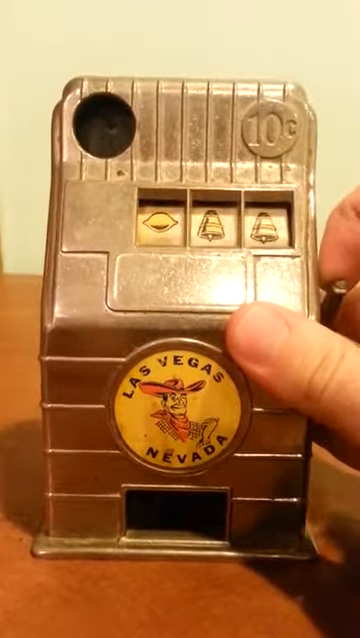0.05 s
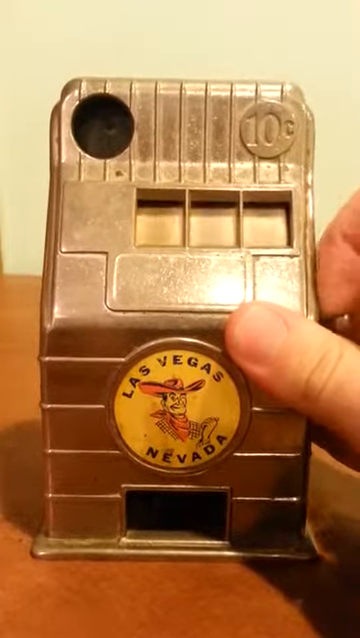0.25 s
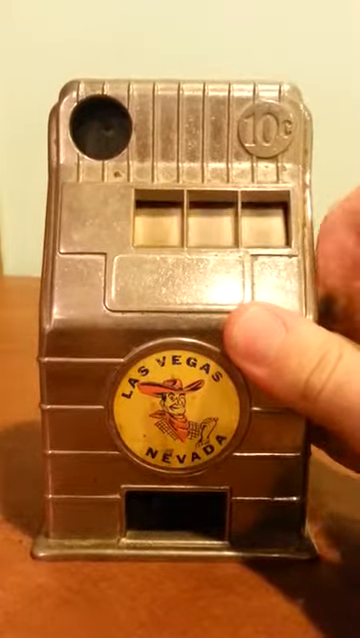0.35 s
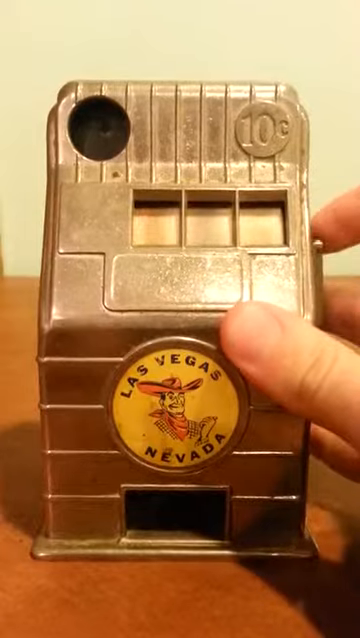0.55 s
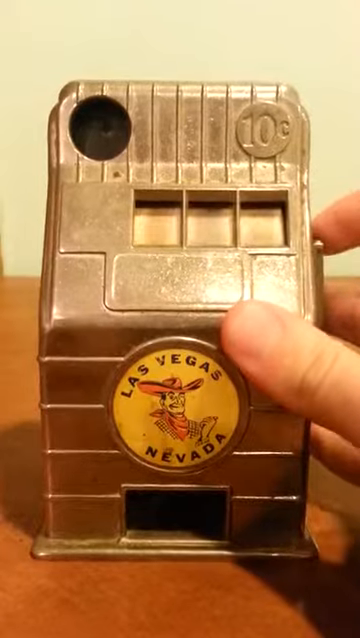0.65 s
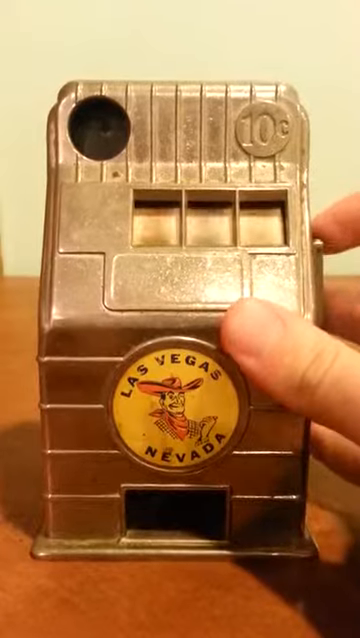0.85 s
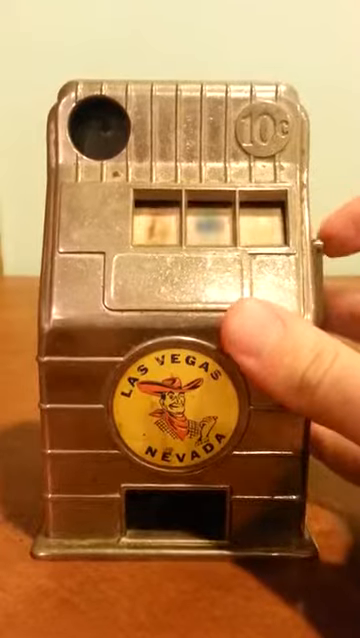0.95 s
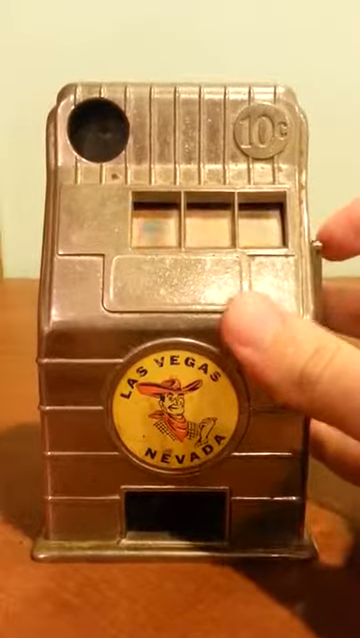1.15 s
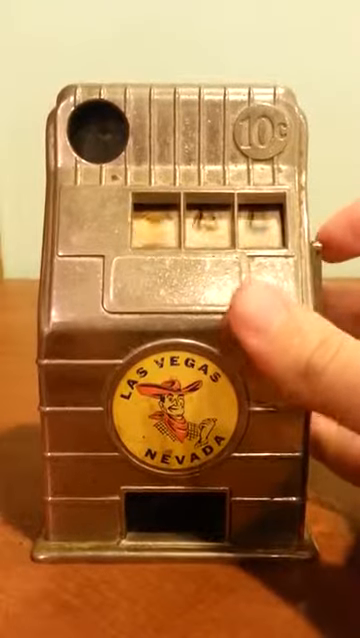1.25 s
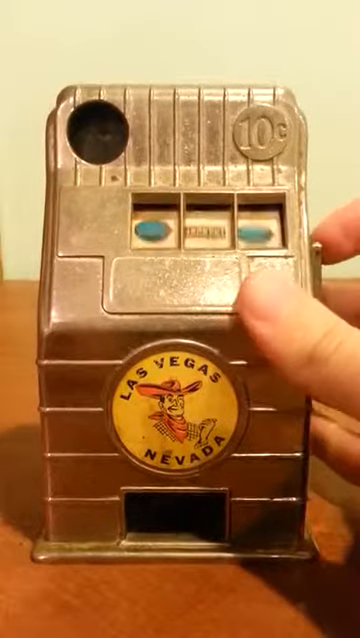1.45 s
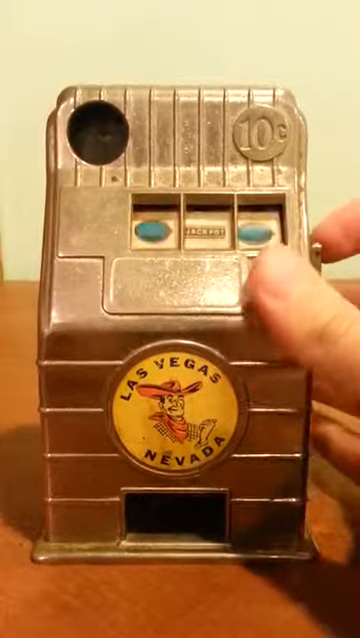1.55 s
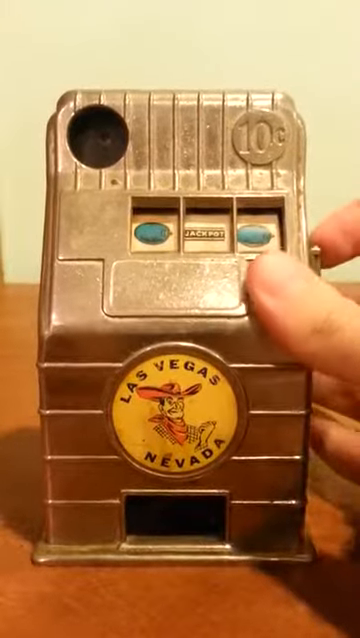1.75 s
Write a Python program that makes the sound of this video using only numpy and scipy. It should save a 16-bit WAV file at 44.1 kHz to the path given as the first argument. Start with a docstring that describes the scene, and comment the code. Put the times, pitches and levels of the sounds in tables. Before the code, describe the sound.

A toy metal slot machine, close and dry in a small room with faint low room tone. A bright lever click at 0.24 s, then a very loud clack at 0.3 s with bouncing knocks until 0.57 s. Tin reels rattle and whir, thinning by 1 s; light ticks and dull catches follow until 1.47 s. Tiny falling squeaks at 1.57 and 1.65 s each meet a soft bump.

```python
"""Toy slot machine on a table

A small die-cast toy slot machine on a wooden table, heard from close by in a small room.
The lever clicks, then trips the spring with a loud clack; three tin reels whir and rattle as it knocks back.
The reels slow, tick and are caught one after another; two tiny squeaks, each ending in a soft bump, close the run.
Contacts are short-lived noise bands and decaying modes; the spin is a dense spray of them; squeaks are gliding tones."""
import sys
import numpy as np
from scipy import signal
from scipy.io import wavfile
from scipy.ndimage import uniform_filter1d

SR = 44100
rng = np.random.default_rng(int(sys.argv[2]) if len(sys.argv) > 2 else 0)


def unload_audio(sound):
    """Save the sound as a 16-bit wav file, at the path given as the first command line argument."""
    columns = np.transpose(np.atleast_2d(sound))
    # keep every value between -1 and 1, then stretch to whole-number steps
    steps = np.round(np.clip(columns, -1, 1) * 32767)
    wavfile.write(sys.argv[1], SR, steps.astype(np.int16))


N = 79380
T = np.arange(N) / SR

# metal contacts of lever, pawls and reels: (time [s], crack level [dB], case ring level [dB], reel ring level [dB])
CONTACTS = [(0.2356, -12, -35.5, -32), (0.3006, -4, -7, -20), (0.305, -7, -17.5, -36),
            (0.32, -3.5, -33, -8), (.382, -11, -17.5, -19), (0.398, -14, -42, -9.5),
            (0.41, -33, -56, -17.5), (.4737, -23, -19.5, -27), (.4932, -15, -26.5, -24),
            (0.5217, -14, -54, -15.5), (.56, -6.5, -21, -20.5), (.5685, -11, -22.5, -8),
            (.6645, -51, -34.5, -35), (.7192, -22.5, -27, -25.5), (.7561, -26, -31.5, -29),
            (0.8135, -38.5, -53, -26.5), (.8868, -21.5, -28, -57), (.9092, -23.5, -35.5, -22.5),
            (.937, -27.5, -35.5, -48), (.9701, -28, -43, -70), (1.0245, -28, -49, -62),
            (1.097, -33.5, -47.5, -37), (1.219, -33, -54, -40.5), (1.2285, -49, -32.5, -33),
            (1.2546, -23, -42, -50), (1.297, -33, -43, -39), (1.3333, -49, -47.5, -55),
            (1.3846, -32.5, -42.5, -36), (1.398, -34, -34, -28.5), (1.4538, -26.5, -33, -26.5),
            (1.465, -30, -31, -42)]
# heavy blows that shake the table; the first releases the spring: (time [s], level [dB])
HEAVY_BLOWS = [(0.304, -37), (.352, -33.5), (0.56, -43.5)]
# modes of the cast case: (frequency [Hz], relative level [dB], T60 [s])
CASE_MODES = [(528.8, -9, 0.07), (593, -7.5, 0.042), (704, -11.5, 0.08), (812.6, -4, 0.05), (880, -6, 0.1),
              (1268, 0, 0.037), (1370, -4, 0.073), (1438, -4.5, 0.026)]
# modes of the tin reels: (frequency [Hz], relative level [dB], T60 [s])
REEL_MODES = [(2484, -34.5, 0.033), (2885, -24.5, 0.18), (3140, -7.5, 0.067), (3850, -17, 0.036),
              (4270, 2, 0.022), (4368, -4, 0.018), (5296, -9.5, 0.04), (6040, -16, 0.069)]
# stereo balance: (frequency [Hz], left minus right level [dB])
STEREO_BALANCE = [(350, 2), (550, 4.5), (850, 3.5), (5000, -2.5)]

REEL_WAVER, CASE_WAVER = .016, .01  # rms share by which pitches wander
RISE_S = 0.0019  # time constant with which a contact spreads through the metal
LEFT_LAG_S, LAG_ABOVE_HZ = 0.000435, 1100  # the treble reaches the left channel later


def from_db(db):
    """Decibels are twenty times the decimal logarithm of amplitude: convert to gain."""
    return 10 ** (np.asarray(db) / 20)


def rms_one(x):
    """Root-mean-square normalisation: scale to unit rms."""
    return x / np.sqrt(np.mean(x ** 2) + 1e-20)


def at_hz(points, hz):
    """Interpolate a table along a logarithmic frequency axis."""
    f, v = np.transpose(points)
    return np.interp(np.log(hz), np.log(f), v)


def level(curve, s):
    """Gain of an envelope drawn in decibels, silent outside its ends."""
    return from_db(np.interp(s, *np.transpose(curve), left=-200, right=-200))


def pan(db):
    """Intensity stereo: split a left-minus-right level difference between two gains."""
    return from_db(np.array([[db], [-db]]) / 2)


def decay_per_sample(t60):
    """Exponential decay: the amplitude factor per sample that gives 60 dB in t60 seconds."""
    return np.exp(-np.log(1000) / (t60 * SR))


def soften(x, seconds):
    """First-order relaxation: spread an onset over a short rise time."""
    r = np.exp(-1 / (seconds * SR))
    return signal.lfilter([1 - r], [1, -r], x)


def clicks(s, sizes):
    """Impulsive excitation: a train of single-sample blows."""
    out = np.zeros(N, np.asarray(sizes).dtype)
    np.add.at(out, np.clip((s * SR).astype(int), 0, N - 1), sizes)
    return out + 1e-18  # keeps the filters off exact zero


def noise_bands(spectrum):
    """Third-octave analysis: yield (Hz, stereo noise band); the bands share unit power before balance."""
    # interchannel coherence: (frequency [Hz], left-right correlation [1])
    coherence = [(600, 0.36), (14000, 0.1)]
    edges = 28 * 2 ** (np.arange(29) / 3)
    centres = np.sqrt(edges[1:] * edges[:-1])
    gains = from_db(at_hz(spectrum, centres)) * np.sqrt(np.diff(edges))
    gains = gains / np.linalg.norm(gains)
    white = rng.standard_normal((2, 2, N))
    for k, hz in enumerate(centres):
        band_pass = signal.butter(2, edges[k:k + 2], "band", fs=SR, output="sos")
        mid, side = signal.sosfilt(band_pass, white[k % 2])
        alike = np.clip(at_hz(coherence, hz), -1, 1)
        band = rms_one(np.sqrt(1 + alike) * mid + np.sqrt(1 - alike) * side * [[1], [-1]])
        if hz > LAG_ABOVE_HZ:
            band[0] = np.roll(band[0], int(LEFT_LAG_S * SR))
        yield hz, band * pan(at_hz(STEREO_BALANCE, hz)) * gains[k]


def crack(s, db, tilt_db):
    """High modal density: each contact wakes a crowd of brief modes, heard as noise; the high ones die first."""
    # spectrum of a contact: (frequency [Hz], relative density [dB per Hz])
    spectrum = [(40, -21.5), (280, -7), (560, -7.5), (820, -1), (1080, -1.5), (2200, 0.5), (3600, 8),
                (6200, -2), (10000, -3.5), (14000, -14.5)]
    t60_at_3khz, damping_power = 0.043, 0.36  # seconds; power of frequency by which it shortens
    colour_spread_db = 5.5  # of each band from contact to contact
    out = np.zeros((2, N))
    for hz, band in noise_bands(spectrum):
        ratio = hz / 3000
        power_decay = decay_per_sample(t60_at_3khz / ratio ** damping_power) ** 2
        colour_db = colour_spread_db * (np.clip(rng.standard_normal(len(s)), -2, 2) - .5)
        band_db = db + colour_db + tilt_db * np.log2(max(ratio, .5))  # tilt in dB per octave
        power = clicks(s, from_db(band_db) ** 2)
        out += band * np.sqrt(signal.lfilter([1], [1, -power_decay], soften(power, RISE_S)))
    return out


def ring(modes, s, db, waver=0):
    """Modal synthesis: blows excite damped resonances unevenly; pitches wander by the rms share `waver`."""
    strike_spread_db = 3.5
    out = np.zeros((2, N))
    for hz, mode_db, t60 in modes:
        size, turn = rng.standard_normal((len(s), 2)).T
        wander = rms_one(uniform_filter1d(rng.standard_normal(N), size=450))
        spin = np.exp(2j * np.pi * np.cumsum(hz * (1 + waver * wander)) / SR)
        blows = clicks(s, from_db(db + mode_db + strike_spread_db * size) * np.sign(turn))
        # dividing by the carrier starts every blow at the same phase
        envelope = signal.lfilter([1], [1, -decay_per_sample(t60)], blows / spin)
        z = spin * soften(envelope, RISE_S)
        left_phase = 2 * np.pi * hz * LEFT_LAG_S * (hz > LAG_ABOVE_HZ) + .5 * rng.standard_normal()
        stereo = np.imag([z * np.exp(-1j * left_phase), z])
        out += np.sqrt(2) * pan(at_hz(STEREO_BALANCE, hz)) * stereo
    return out


def bounces(s, db, count):
    """Inelastic rebound: each contact lands again in an uneven, dying run; harder ones lose more each time."""
    mean_gap_s = .006
    loss_slope, lossless_db = 0.51, -52  # dB lost per bounce for each dB above this level
    gaps = mean_gap_s * (.5 + rng.random((len(s), count)))
    loss_db = loss_slope * np.maximum(db - lossless_db, 10)
    losses = np.outer(loss_db, 1 + np.arange(count))
    again_s = s[:, None] + np.cumsum(gaps, axis=1)
    return np.append(s, again_s), np.append(db, db[:, None] - losses)


def clacks():
    """Impact excitation: hard contacts crack, bounce and ring case and reels; heavy blows shake the table."""
    # modes of the wooden table: (frequency [Hz], relative level [dB], T60 [s])
    table_modes = [(99.5, -4.5, 0.45), (121.2, 2.5, 0.28), (251, -1, 0.24)]
    bright_above_db, tilt_per_db = -20, 0.2425  # harder is brighter: dB per octave for each dB
    s, db, case_db, reel_db = np.transpose(CONTACTS)
    crack_s, crack_db = bounces(s, db, count=3)
    out = crack(crack_s, crack_db, tilt_per_db * (crack_db - bright_above_db))
    out += ring(CASE_MODES, s, case_db, CASE_WAVER)
    out += ring(REEL_MODES, s, reel_db, REEL_WAVER)
    return out + ring(table_modes, *np.transpose(HEAVY_BLOWS))


def spinning_reels():
    """Dense random impacts: loose reels chatter brightly on the axle and whir through the case."""
    # chatter on the axle: (time [s], level [dB])
    rattle = [(.3, 8), (.315, -17), (.4, -23), (.435, -36.5), (.485, -21), (.545, -30), (.73, -33.5),
              (.85, -47.5), (.925, -31), (1.0, -75), (1.2, -57), (1.27, -47), (1.36, -64.5), (1.41, -38.5),
              (1.48, -98)]
    # rumble of the turning reels through the case: (time [s], level [dB])
    whir = [(0.298, -25.5), (.39, -36.5), (.72, -39), (.85, -50), (0.929, -41.5), (0.998, -67.5),
            (1.25, -55), (1.35, -62), (1.43, -49), (1.519, -91)]
    count, contacts_per_s, spread_db = 700, 400, 3
    slip, size = rng.standard_normal((count, 2)).T
    s = rattle[0][0] + (np.arange(count) + 2 * slip) / contacts_per_s
    uneven_db = spread_db * np.clip(size, -2, 2)
    rattle_db = 20 * np.log10(level(rattle, s)) + uneven_db
    whir_db = 20 * np.log10(level(whir, s)) + uneven_db
    out = crack(s, rattle_db, tilt_db=-0.14)
    out += ring(REEL_MODES, s, rattle_db - 7.5, REEL_WAVER)
    return out + ring(CASE_MODES, s, whir_db, CASE_WAVER)


def lever_catch():
    """Free vibration: the catch pings as the lever slides past it; the spring then lets go and hums."""
    # modes of the lever's catch: (frequency [Hz], level [dB], T60 [s])
    catch_modes = [(291, -36.5, 0.29), (590, -31.5, 0.16), (3050, -25.5, .03), (6220, -10, 0.016),
                   (9940, -11, 0.021)]
    # hum of the released spring: (frequency [Hz], level [dB], T60 [s])
    spring_modes = [(391.7, -50.5, 4.5)]
    catch_s, release_s = CONTACTS[0][0], HEAVY_BLOWS[0][0]
    ping = ring(catch_modes, np.array([catch_s]), 0, REEL_WAVER)
    return ping + ring(spring_modes, np.array([release_s]), 0)


def pawl():
    """Modal ringing: the dropping pawl sounds clearly between the last turns."""
    # drops of the pawl: (time [s])
    drop_s = [.972, 1.0245]
    # modes of the pawl: (frequency [Hz], level [dB], T60 [s])
    pawl_modes = [(903, -38.5, 0.078), (1388, -26.5, 0.069)]
    return ring(pawl_modes, np.array(drop_s), 0, CASE_WAVER)


def squeaks():
    """Frictional oscillation: metal rubs on metal in short, nearly pure chirps that sag in pitch."""
    # squeaks of the mechanism: (time of peak [s], length [s], frequency at peak [Hz], level [dB])
    chirps = [(1.571, 0.015, 3330, -35.5), (1.654, 0.013, 3455, -39)]
    octave_db, waver_share, sag_hz_per_s = -21, 0.0111, 3000
    out = np.zeros(N)
    for s, length, hz, db in chirps:
        waver = rms_one(uniform_filter1d(rng.standard_normal(N), size=150))
        pitch = hz * (1 + waver_share * waver) - sag_hz_per_s * (T - s)
        phase = 2 * np.pi * np.cumsum(pitch) / SR
        swell = np.exp(-(2 * (T - s) / length) ** 2)
        tone = np.sin(phase) + from_db(octave_db) * np.sin(2 * phase)
        out += np.sqrt(2) * from_db(db) * swell * tone
    return out * pan(-6.5)


def bumps():
    """Soft impact: settling parts ring only low modes of the case, with a dull scuff."""
    # settling of the parts: (time [s], level [dB])
    settling = [(1.186, -37.5), (1.29, -35), (1.443, -29), (1.579, -30.5), (1.658, -36.5)]
    # low modes of the case: (frequency [Hz], relative level [dB], T60 [s])
    low_modes = [(576, -2.5, 0.045), (890, -15, 0.055)]
    s, db = np.transpose(settling)
    return ring(low_modes, s, db, CASE_WAVER) + crack(s, db - 7, tilt_db=-7)


def room(x):
    """Diffuse reverberation: the short, slightly dull, exponentially decaying tail of a small room."""
    t60, tail_db, dull_above_hz, build_up_s = 0.17, -13, 7100, 0.0067
    t = T[:SR // 2]
    envelope = np.exp(-np.log(1000) * t / t60) * (1 - np.exp(-t / build_up_s))
    tail = rng.standard_normal((2, len(t))) * envelope
    tail = signal.sosfilt(signal.butter(1, dull_above_hz, fs=SR, output="sos"), tail)
    tail = tail / np.linalg.norm(tail, axis=1, keepdims=True)
    return from_db(tail_db) * signal.fftconvolve(x, tail, axes=1)[:, :N]


def room_tone():
    """Stationary noise: a quiet, steady background shaped in third octaves."""
    # spectrum of the background: (frequency [Hz], relative density [dB per Hz])
    spectrum = [(30, -28.5), (115, 2.5), (230, 2.5), (800, -11.5), (14000, -23)]
    return from_db(-53.5) * sum(band for hz, band in noise_bands(spectrum))


def scene():
    """Superposition: the toy, its reverberation and the room tone add linearly."""
    toy = clacks() + spinning_reels() + lever_catch() + pawl() + squeaks() + bumps()
    return toy + room(toy) + room_tone()


def record(dry):
    """Saturation and band-limiting: the loudest peaks round off below full scale; the top is cut."""
    clip_level, cutoff_hz = 1, 14800
    clipped = dry / (1 + (dry / clip_level) ** 4) ** .25
    low_pass = signal.ellip(10, .2, 70, cutoff_hz, fs=SR, output="sos")
    return signal.sosfilt(low_pass, clipped)


dry = scene()
out = record(dry)
unload_audio(out)
```